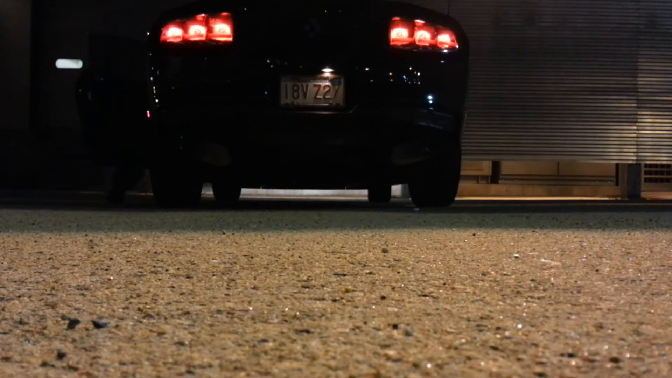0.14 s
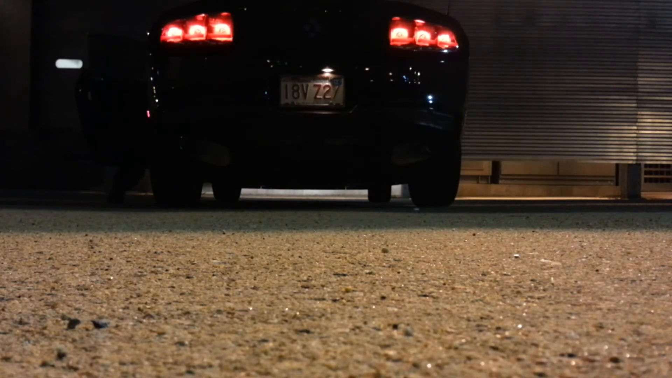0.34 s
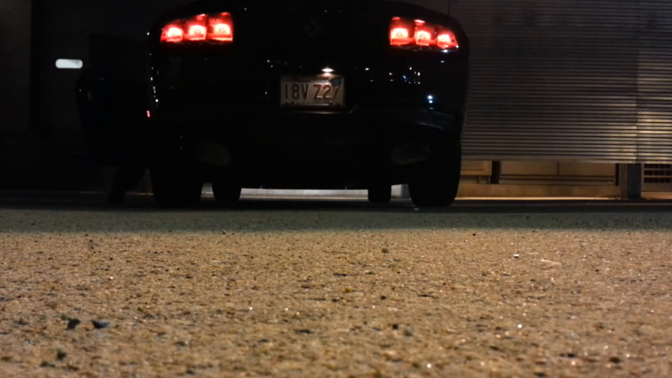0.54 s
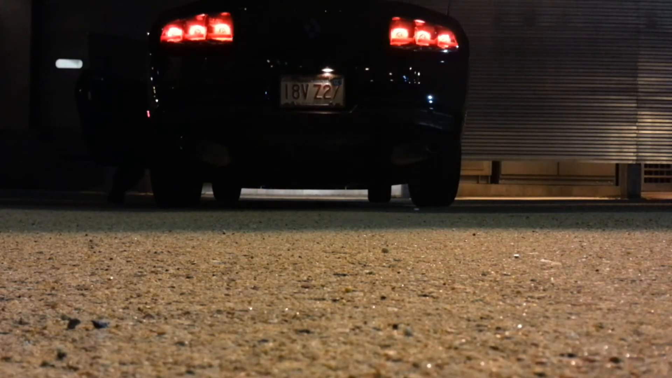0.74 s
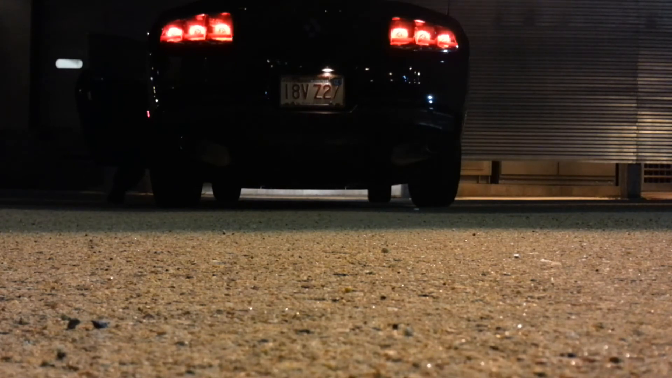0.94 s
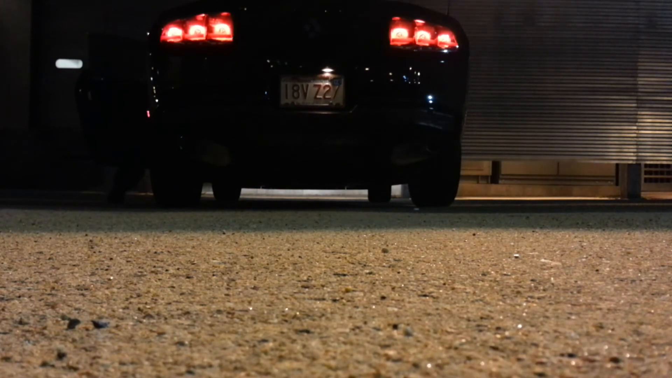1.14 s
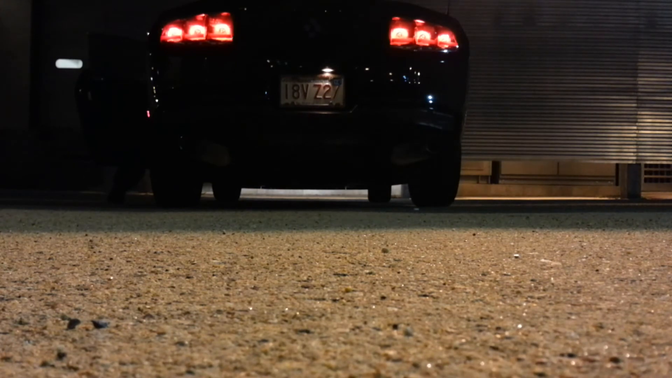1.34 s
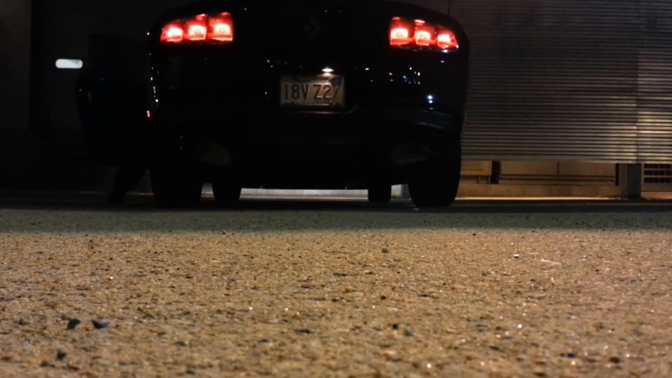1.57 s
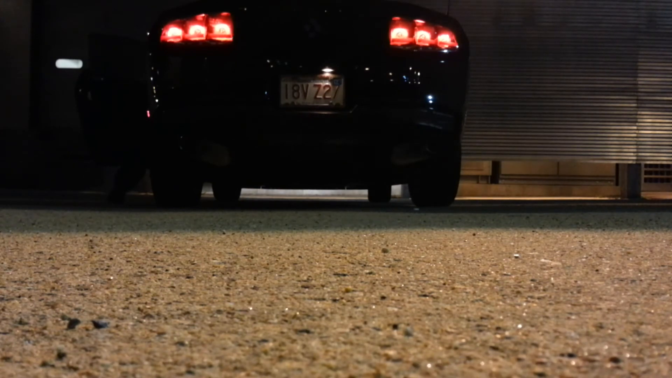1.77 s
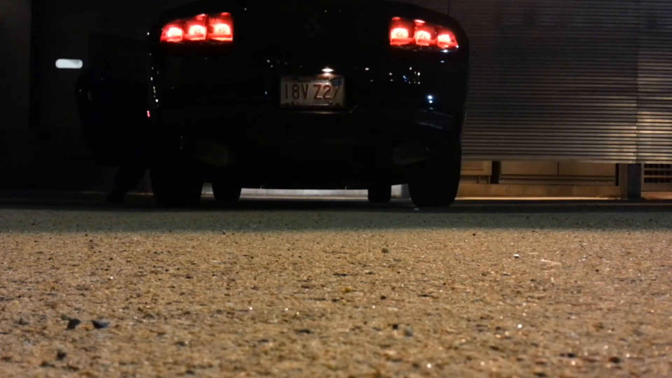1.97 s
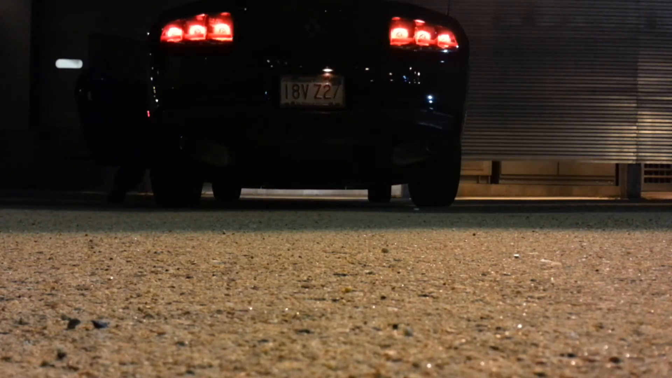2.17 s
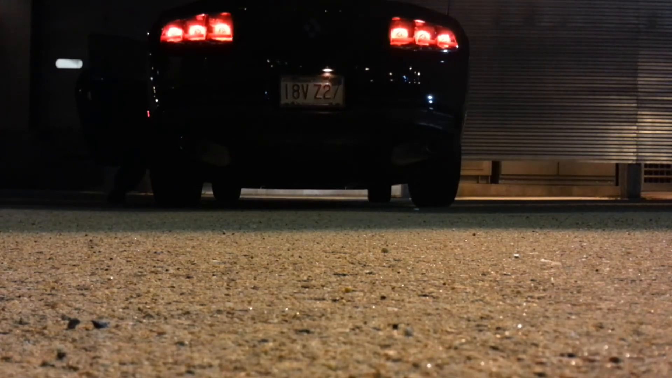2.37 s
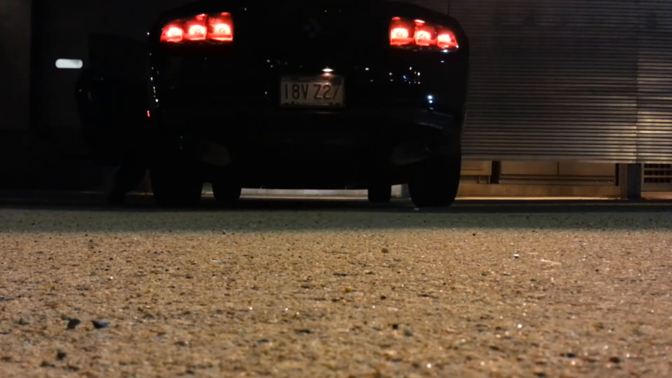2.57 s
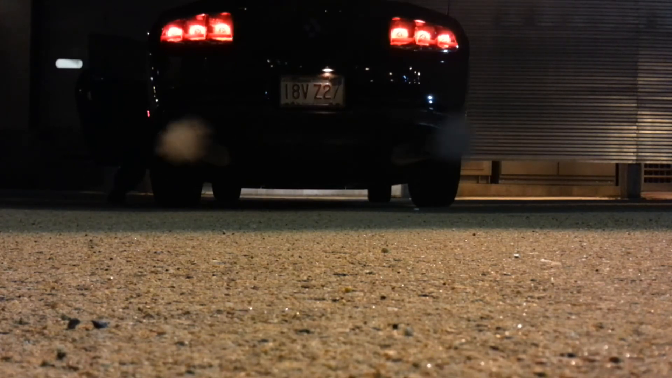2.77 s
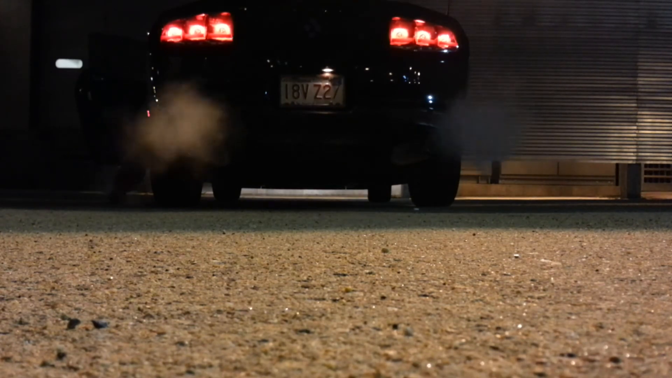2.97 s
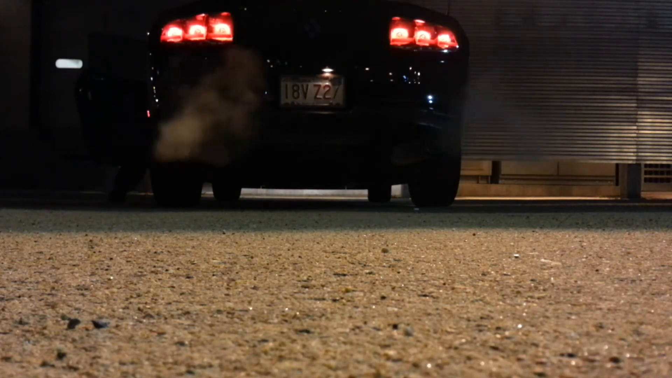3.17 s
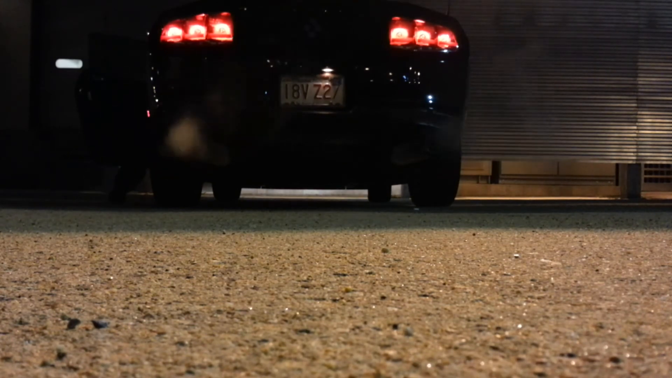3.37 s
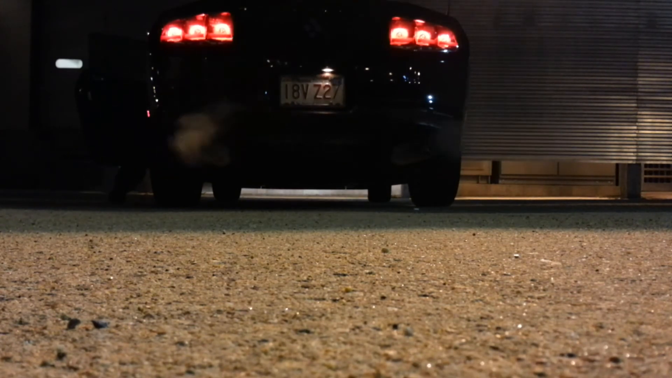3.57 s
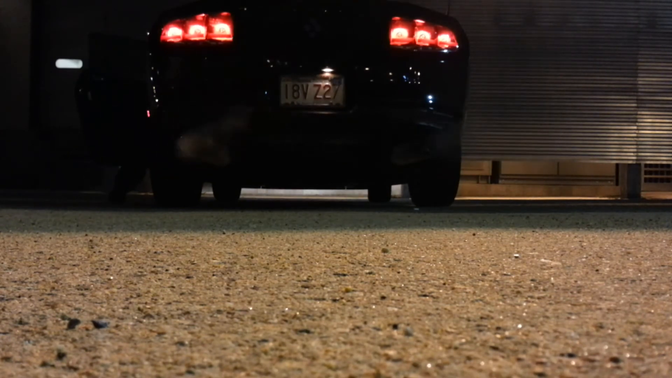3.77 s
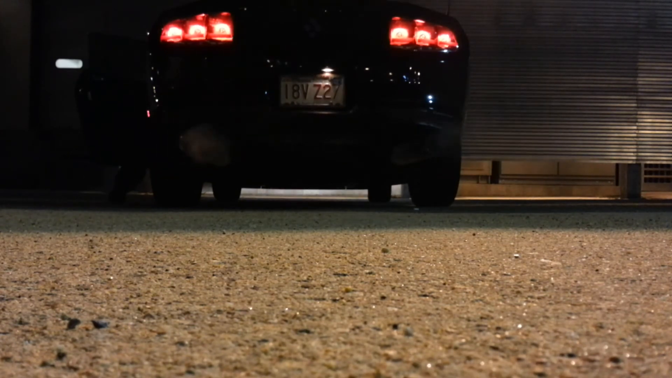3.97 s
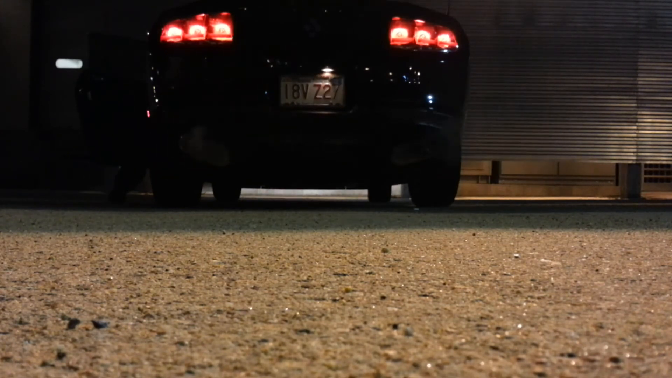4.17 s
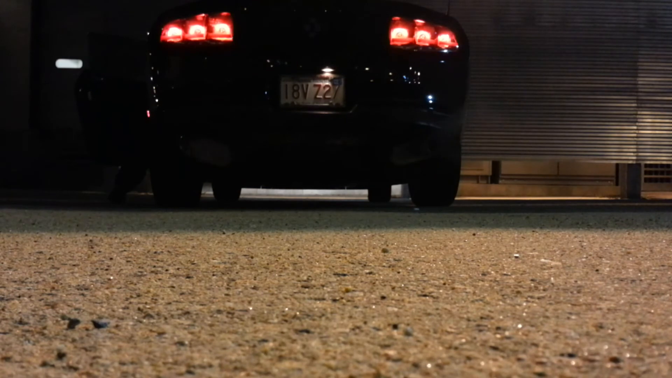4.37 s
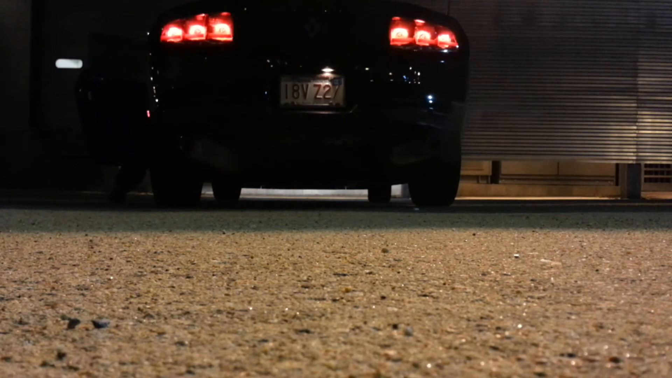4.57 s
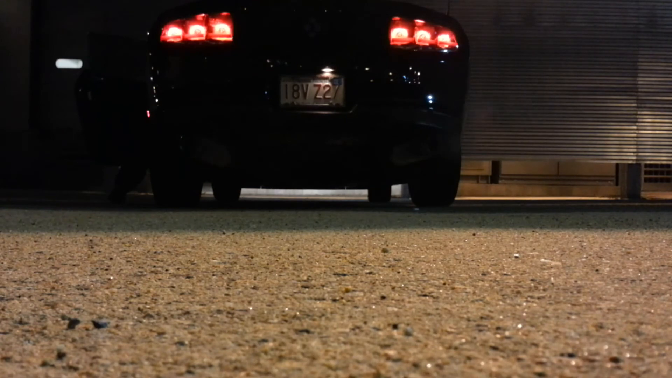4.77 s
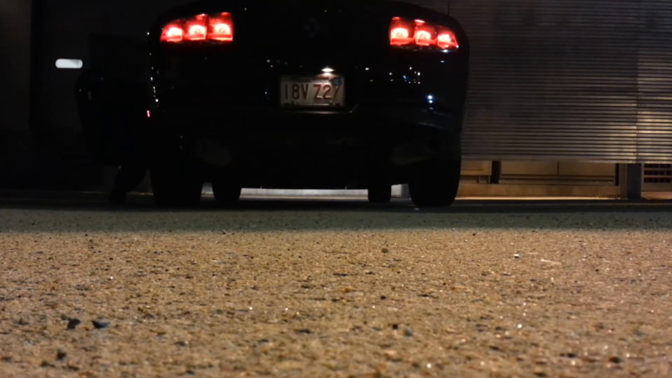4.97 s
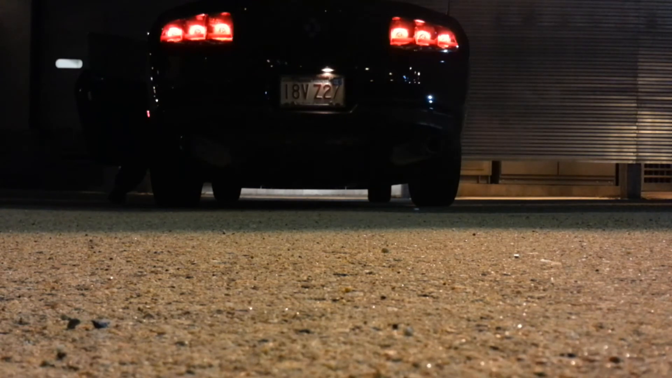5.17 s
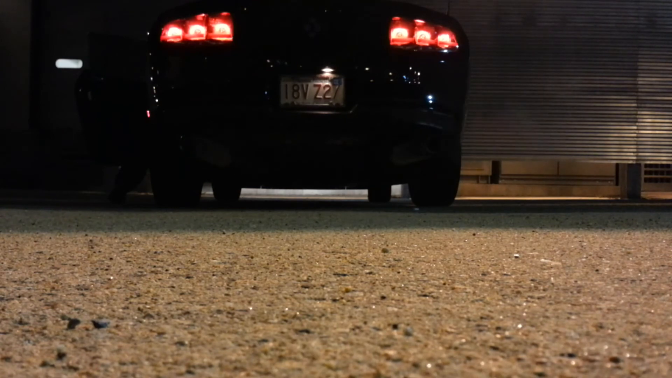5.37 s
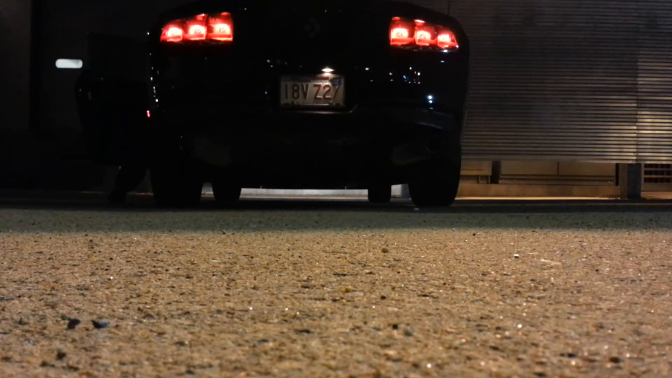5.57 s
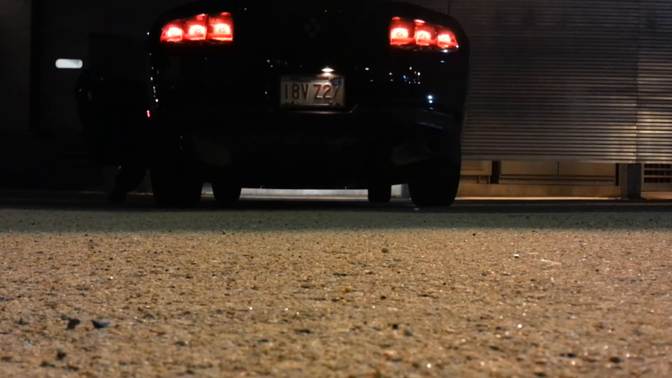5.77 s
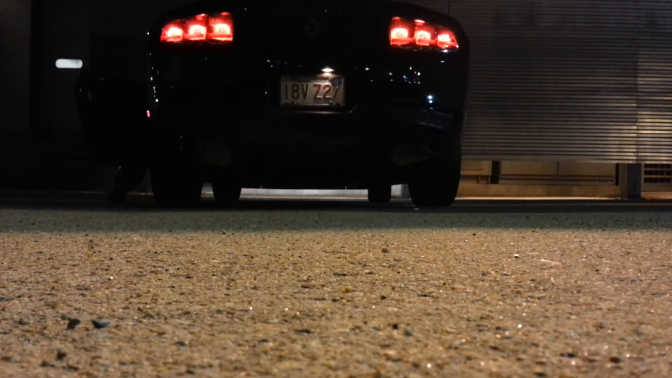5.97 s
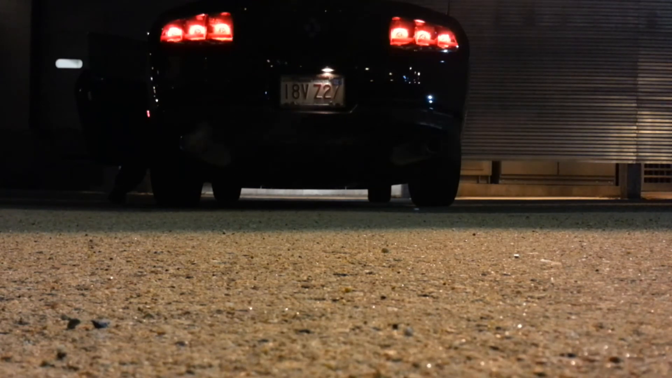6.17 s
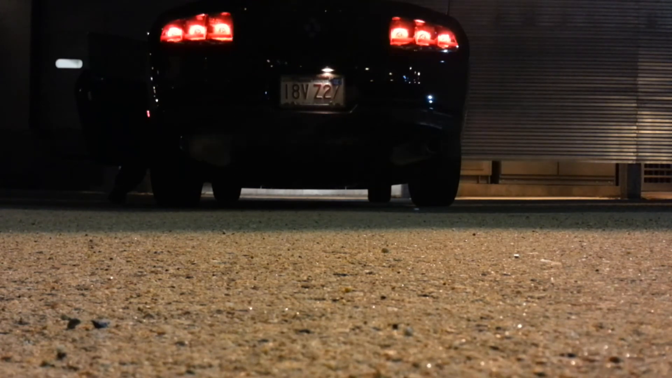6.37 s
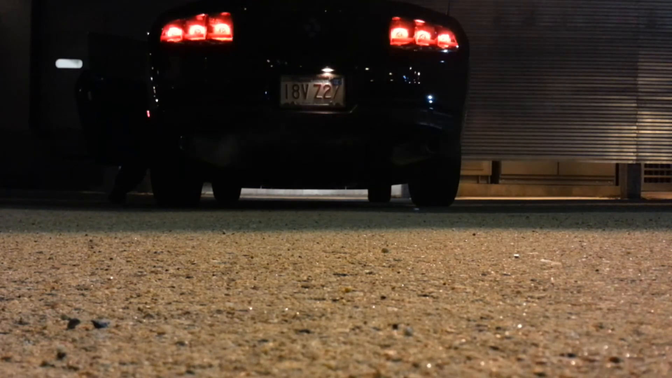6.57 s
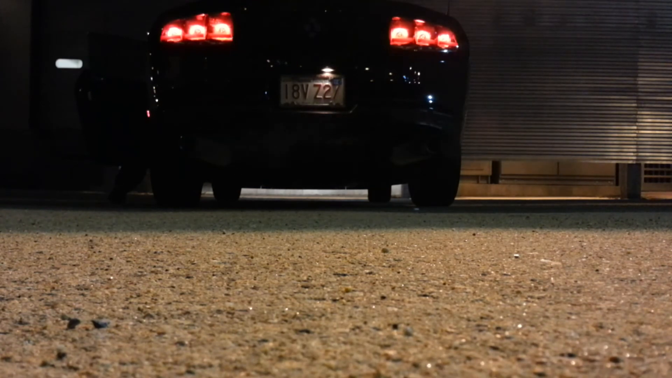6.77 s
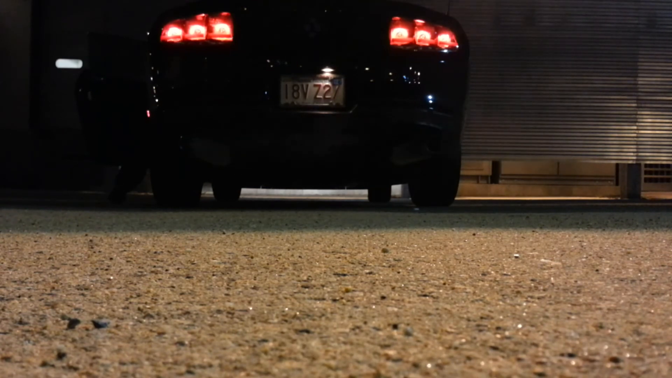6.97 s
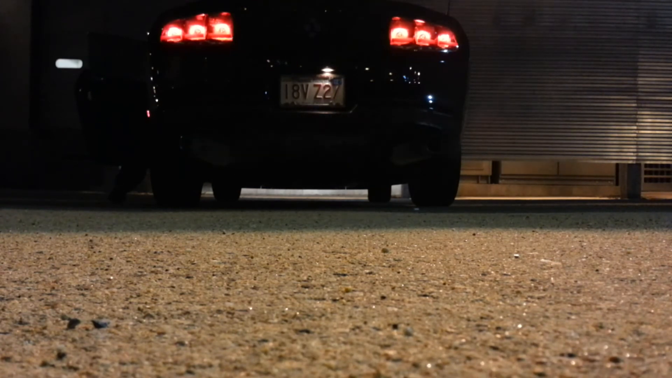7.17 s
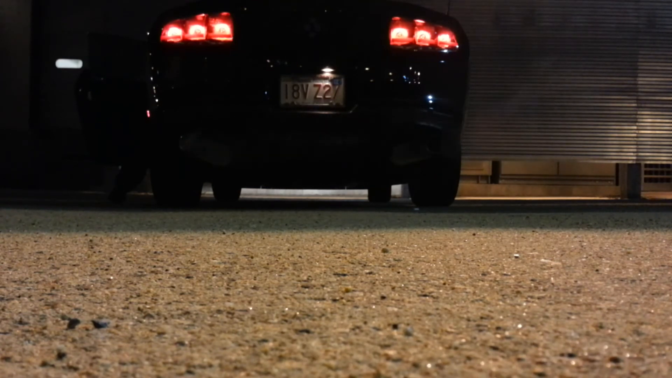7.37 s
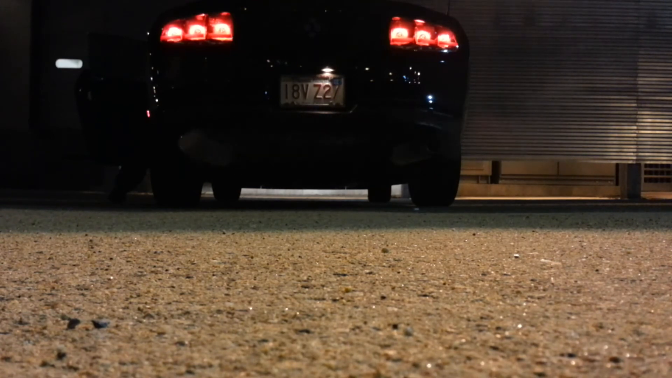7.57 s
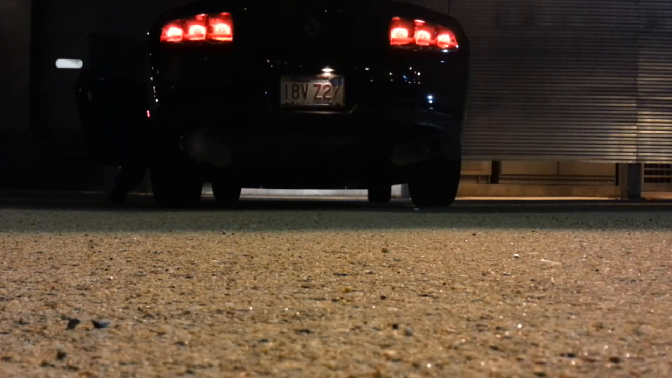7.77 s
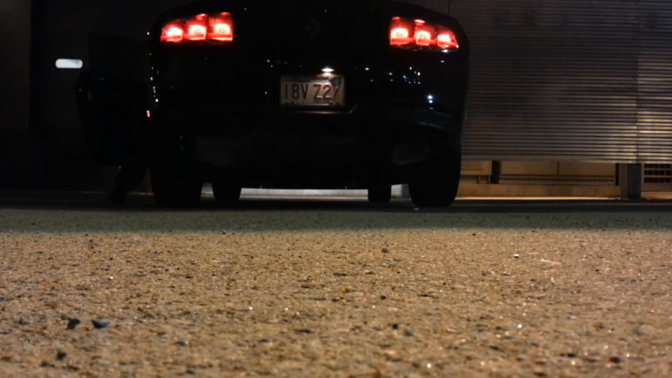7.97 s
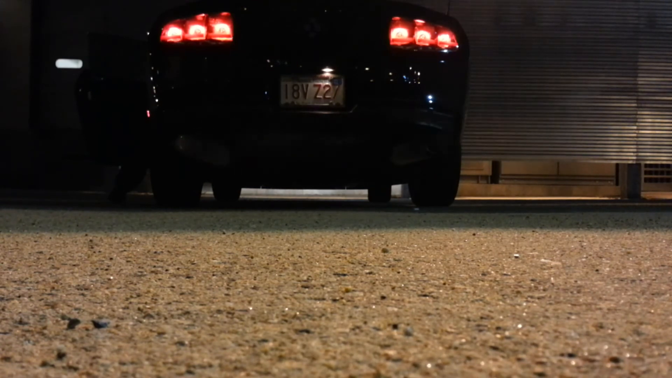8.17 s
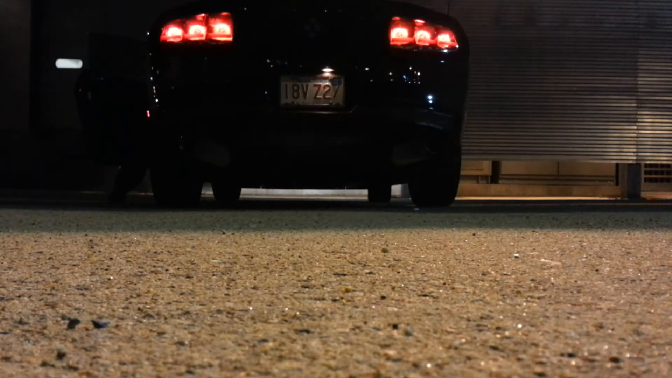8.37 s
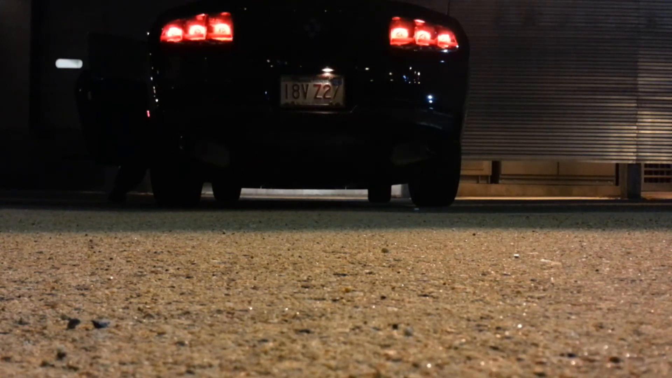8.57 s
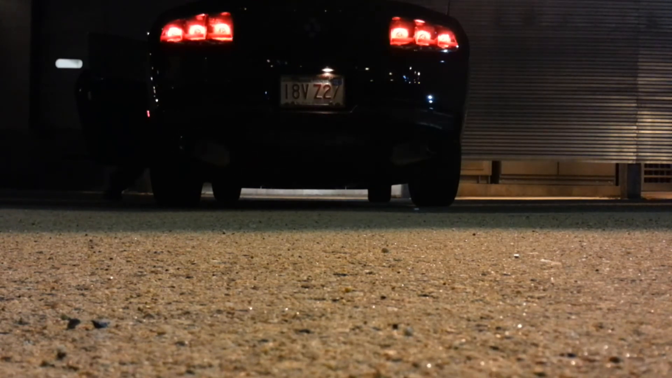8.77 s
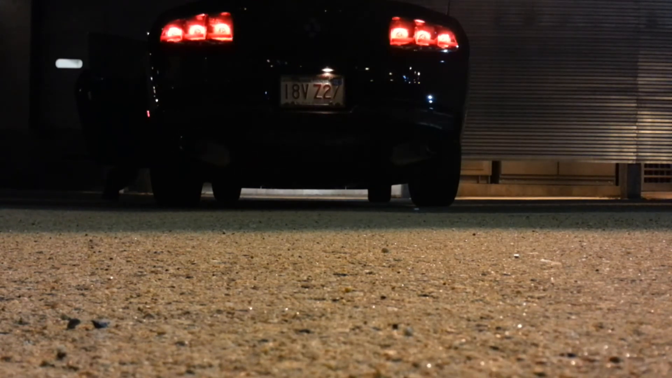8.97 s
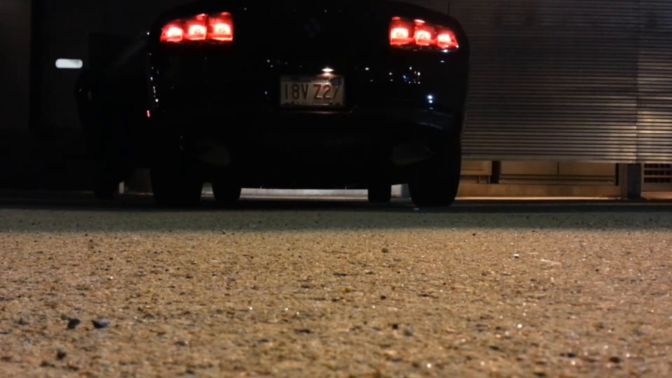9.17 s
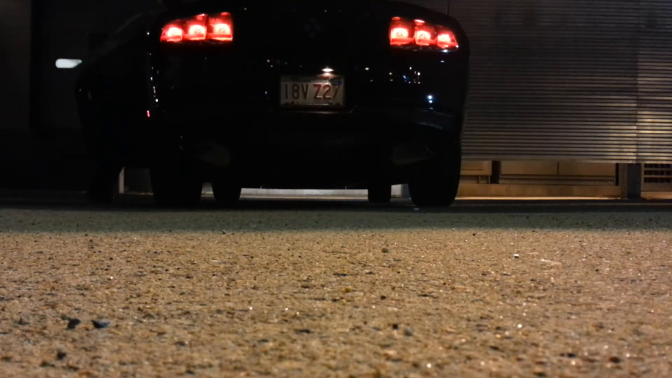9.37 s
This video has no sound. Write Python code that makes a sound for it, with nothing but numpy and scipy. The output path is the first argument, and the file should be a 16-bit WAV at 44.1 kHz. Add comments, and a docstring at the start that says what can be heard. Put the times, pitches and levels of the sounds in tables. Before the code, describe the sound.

A stereo microphone low on the ground faces the two tailpipes of a parked car. After near quiet and a thin pump hiss, a metallic clank and brief grinding crank start the six-cylinder engine. It barks up in speed, settles into a deep, uneven, raspy idle for several seconds, then slows quickly and stops. Distant traffic murmur and a few faint ticks remain.

```python
"""Thumping, raspy exhaust of a V6 car outdoors, heard in stereo near the ground, facing its twin tailpipes.
The fuel pump primes, the starter cranks, the engine catches, flares, settles to idle, then is switched off.
Every firing rings the silencer and pipes as a pulse and leaves the tailpipes as a puff of shaped noise.
Filtered noise makes the starter, pump and valve gear close by, and the town murmuring in the distance."""
import sys
import numpy as np
from scipy import signal
from scipy.fft import rfft, irfft
from scipy.io import wavfile
from scipy.ndimage import uniform_filter1d, minimum_filter1d

SR = 44100
rng = np.random.default_rng(int(sys.argv[2]) if len(sys.argv) > 2 else 0)


def bounce(signal):
    """Save signal as a 16-bit WAV file at the path given by the first command-line argument."""
    frames = np.transpose(np.atleast_2d(signal))
    limited = np.clip(frames, -1, 1)
    pcm = np.round(limited * 32767).astype(np.int16)
    wavfile.write(sys.argv[1], SR, pcm)


N = 416025
TIME, HZ = np.arange(N) / SR, np.fft.rfftfreq(2 ** 19, 1 / SR)  # seconds; Hz of the zero-padded spectrum

# Levels in the tables are relative: each voice is levelled, then given its gain.
# Engine speed: (time [s], exhaust pulse rate [1/s])
ENGINE_SPEED = [(2.69, 20.05), (2.75, 36.02), (2.81, 51.73), (2.92, 57.05), (3.05, 64.4), (3.25, 64.03),
                (3.45, 55.42), (3.62, 50.13), (3.9, 50.12), (4.4, 45.39), (4.58, 43.24), (4.8, 42.13),
                (5.2, 41.62), (7.83, 41.36), (7.92, 37.14), (8.05, 30.53), (8.2, 19.73), (8.39, 11.37)]
# Cylinders in firing order, banks in turn:
# (lateness [s], thump [dB], boom [dB], chuff [dB], whistle [dB])
CYLINDERS = [(.0001, 5.5, -2, -7, 3), (-.0002, 4.5, 2, 1, 2.2), (.0001, 3.5, 0, -7, 1.5),
             (-.0001, 5, -5, 1.5, 3.5), (0, 2.5, -2.5, -9, 4.5), (-.0001, 7, -9, 0, 0)]
# Load, positive as the engine pulls up to speed, negative as the revs sink: (time [s], level [dB])
LOAD = [(2.7, -1), (3.0, 5), (3.3, 3), (3.5, -1), (3.7, -11), (4.3, -5.5), (4.6, 1)]
# Throttle, open for a fast idle after the start, then closed: (time [s], opening [0-1])
THROTTLE = [(2.75, 0.14), (3.05, 0.83), (3.5, 0.99), (4.38, 1), (4.56, 0)]
# Exhaust voices, name: (at idle [dB], added at the catch [dB], added at fast idle [dB],
# lost per halving of speed below idle [dB])
EXHAUST_VOICES = {"silencer": (-25.5, 8, 1.5, 2.5), "pipe": (-20, -0.5, .5, 10.5),
                  "tailpipe": (-19, -8.5, 0, 13.5), "overtones": (-32, -3, 9, 12), "roar": (-32.5, 2, 7, 8),
                  "rasp": (-24, 7.5, -0.2, 11.5)}
# Brief exhaust swells from uneven running: (time [s], half length [s], silencer [dB], tailpipe [dB])
SURGES = [(2.867, .04, 3, 11.5), (3.357, 0.079, -4, 12), (3.518, 0.11, 10, 4.5), (5.3, .1, 3.5, -0.5),
          (5.947, 0.11, 5, -2), (6.444, 0.14, 6, -0.5), (7.45, 0.49, 6.5, -0.5), (8.082, 0.12, 8.5, -1)]
# Firings that spit sharply: (time [s], whistle level [dB])
SPITS = [(2.833, 6.5), (2.87, 13.5), (2.958, 7.5), (3.132, 3.5), (3.459, 12), (3.515, 10.5), (4.735, 10),
         (5.212, 9.5), (6.512, 8), (6.609, 7.5), (6.657, 8), (6.945, 9), (7.527, 9.5), (8.141, 6.5),
         (8.297, 9)]
# Firings the cold engine misses: (time [s])
MISFIRES = [2.888, 2.975, 3.039, 3.338, 3.441, 3.553]
# Brief dip of the rasp as the revs start to sink: (time [s], half length [s], level [dB])
RASP_DIP = (3.46, 0.12, -4.5)
# Speeds where a firing harmonic meets a pipe's note and it drones:
# (pulse rate [1/s], width [1/s], level [dB])
PIPE_DRONE = (45.6, 2.2, 7)
TAILPIPE_DRONE = (48.5, 3.07, 8.6)
# Resonances of the exhaust, the last being higher ones of the pipes:
# (frequency [Hz], width [Hz], level [dB])
SILENCER_MODES = [(51.3, 38, 1), (80.7, 5.1, 13)]
PIPE_MODES = [(140, 21, 1), (187.6, 48, -1)]
TAILPIPE_MODES = [(254.1, 11.4, 1)]
OVERTONE_MODES = [(286.6, 14, 4.5), (333.7, 25, 3.5), (398, 27, -8.5), (435, 33, -0.5), (503, 13, -14.5),
                  (639, 49, -7.5), (733, 16, -11)]
# Resonances of the starter's housing, the struck pinion and the whining pump:
# (frequency [Hz], width [Hz], level [dB])
HOUSING_MODES = [(994, 12, 11.5), (1174, 10, 2.5), (1524, 18, 5.5), (1750, 10, 2), (1918, 26, 9),
                 (2143, 17, 2), (2210, 9.5, -5), (2580, 65, 1), (3110, 19, -8), (3800, 11, 7),
                 (6400, 20, 9.5), (7100, 17, -21), (8000, 23, -13), (11030, 41, -1.5)]
CLANK_MODES = [(1940, 52, -14), (2190, 51, 13), (2300, 57, 13), (2680, 75, -12)]
PUMP_WHINE_MODES = [(5900, 61, 4), (6140, 150, -5)]
# Spectrum of the puffs: (frequency [Hz], left [dB], right [dB])
RASP_SPECTRUM = [(2080, -41, -34), (3040, -25.5, -20.5), (3490, -17, -13), (4150, -16.5, -10.5),
                 (4380, -8, -8), (4930, -4.5, -8), (5750, -7.5, 0), (5860, -36, -10.5), (6010, -8.5, 0),
                 (7190, -13.5, 1), (7000, -27, -3), (8350, -20, -12), (10030, -35, -21),
                 (14300, -87, -48.5)]
# Spectra of gas rush, valve gear, starter gears, pump and town: (frequency [Hz], density [dB per Hz])
ROAR_SPECTRUM = [(180, -6), (300, -1.5), (367, -10.5), (450, -4), (545, -11), (714, -6.5), (1700, -30.5),
                 (1930, -22), (2450, -47), (3000, -28), (3900, -59), (6600, -120)]
CLATTER_SPECTRUM = [(530, -46.5), (900, -2.5), (1220, -8), (1350, -4.5), (1690, -13.5), (1930, -8),
                    (2520, -13.5), (3500, -12), (4550, -23), (7700, -120)]
GEAR_SPECTRUM = [(290, -39), (500, -4), (892, -11.5), (971, -10.5), (1170, 1.5), (1320, -12), (1480, -12),
                 (1640, -6), (2140, -1.5), (2880, -5), (5000, -9.5), (6910, -3), (11200, -26), (12700, -47),
                 (14600, -64)]
PUMP_SPECTRUM = [(1760, -36), (3000, -6), (3790, -9), (4150, -3.5), (4930, -5.5), (6070, -1), (6660, -3),
                 (7620, -9), (10700, -23), (13000, -48)]
TOWN_SPECTRUM = [(15, -53), (25, -30), (59, -14), (131, -1), (205, -9.5), (290, -7), (379, -9),
                 (551, -11.5), (1020, -13.5), (1190, -16), (1780, -20), (3030, -37.5), (5600, -44),
                 (7710, -46.5), (14600, -58.5)]
# Starter strokes, a bite and then compressions: (start [s], rise [s], hold [s], level [dB])
STROKES = [(2.154, 0.013, 0.0091, -20), (2.19, .1, 0.056, -26), (2.427, 0.014, 0.027, -24.5),
           (2.527, 0.01, 0.028, -22.5), (2.623, 0.012, 0.032, -23)]
# Small ticks and puffs before the start and around the stop: (time [s], level [dB], rise [s], decay [s])
TICKS = [(.665, -50, .005, .05), (8.472, -39, .0004, .002), (8.508, -35, 0.0074, 0.012),
         (8.648, -51.5, 0.043, 0.024), (9.346, -39, 0.00063, 0.0018), (9.381, -46, .001, .004)]
# Likeness of the two microphones, used within 0 to 1: (frequency [Hz], likeness [1])
CAR_SAME = [(60, 0.77), (130, 1), (290, 1), (620, 0.94), (1360, 1), (2970, -0.17), (6490, 0.89),
            (14200, 0.45)]
STARTER_SAME = [(60, 0.9), (180, 0.79), (530, 0.58), (1590, 0.94), (4750, -1.1), (14200, -0.06)]
TOWN_SAME = [(60, 0.9), (130, 0.95), (290, 0.68), (620, 0.14), (1360, -0.71), (2970, -0.12), (6490, -0.054),
             (14200, 0.078)]
# Balance of the two microphones: (frequency [Hz], left minus right [dB])
CAR_SIDE = [(60, -1), (110, -5.5), (200, 1.5), (370, -0.5), (680, 0), (1250, -3.5), (2290, 1), (4200, -2.5),
            (7720, -11.5), (14200, -11)]
TOWN_SIDE = [(60, -5), (180, 1), (530, 0), (1590, 3), (4750, -2), (14200, -1.5)]

IDLE_RATE = 41  # pulses per s
# The first firings burn rich and hard; that dies away, and the pipes fall silent after the last stroke
CATCH_RISE_S, CATCH_DECAY_S, STOP_S = 0.025, 0.41, .12
MISFIRE_DB = -22
STROKE_RELEASE_S, WHIR_DB, LET_GO_S, SPIN_DOWN_DB_PER_S = 0.016, -32, 2.73, 51
PUMP_ON_S, PUMP_OFF_S, PUMP_RAMP_S, PUMP_DB = 0.738, 1.875, 0.023, -46.5
TOWN_DB = -30.5
EDGE_HZ, LIMIT = 14700, 1.0  # upper band limit; full scale


def firings(whistle_scatter_db=2.0, chuff_scatter_db=1.75, thump_scatter_db=1.5, boom_scatter_db=3.0):
    """Crank rotation gives the pulse times; cylinder and chance set thump, boom, chuff and whistle sizes."""
    s, rate = np.transpose(ENGINE_SPEED)
    turns = np.cumsum(np.interp(TIME, s, rate, 0, 0)) / SR + .5
    times = TIME[1:][np.diff(np.floor(turns)) > 0]
    cylinder = np.arange(len(times)) % len(CYLINDERS)
    late, thump_db, boom_db, chuff_db, whistle_db = np.array(CYLINDERS)[cylinder].T
    chance = rng.standard_normal((5, len(times)))
    chuff_db = chuff_db + chuff_scatter_db * chance[0]
    whistle_db = whistle_db + whistle_scatter_db * chance[4]
    for when, db in SPITS + [(when, MISFIRE_DB) for when in MISFIRES]:
        k = np.argmin(abs(times - when))
        whistle_db[k] = db
        chuff_db[k] += 0.59 * db
        thump_db[k] += 0.37 * min(db, 0)  # only a misfire weakens the thump
    lope = np.interp(np.interp(times, s, rate), [43, 49], [1, .3])  # the cylinders even out above idle
    times = times + lope * late + .00014 * chance[1]
    thump = amp(thump_db + thump_scatter_db * chance[2])
    boom = amp(lope * boom_db + boom_scatter_db * chance[3])
    return times, thump, boom, amp(chuff_db), amp(whistle_db)


def exhaust(times, thump, boom, lead_s=0.003264):
    """Each pulse, with the eddies behind it, rings the silencer, the pipe and the tailpipe."""
    eddies = evened(puffs(times, thump, 0.055, 1.0) * rng.standard_normal(N))
    times = times - lead_s  # the pressure wave runs ahead of the gas
    push = -evened(clicks(times, thump)) + .2 * eddies
    kick = -evened(clicks(times, boom)) + .25 * eddies
    silencer = filtered(push, ringing(SILENCER_MODES) * band(43.0, 121, order=4))
    pipe = filtered(push, ringing(PIPE_MODES) * band(113, 211.5))
    tailpipe = filtered(kick, ringing(TAILPIPE_MODES) * band(137, 225))
    overtones = filtered(-kick + 1.02 * eddies, ringing(OVERTONE_MODES) * band(224, 750))
    rate = curve(ENGINE_SPEED)
    throb_db = sum(bump(TIME, s, length, db) for s, length, db, _ in SURGES)
    boom_db = sum(bump(TIME, s, length, db) for s, length, _, db in SURGES)
    sound = levelled(silencer) * drive("silencer") * amp(throb_db)
    sound += levelled(pipe) * drive("pipe") * amp(bump(rate, *PIPE_DRONE))
    sound += levelled(tailpipe) * drive("tailpipe") * amp(boom_db + bump(rate, *TAILPIPE_DRONE))
    sound += levelled(overtones) * drive("overtones")
    return filtered(sound, balance(CAR_SIDE))


def rasp(times, chuff, whistle, split_hz=5900, lag_s=.00004, tear_db=2.5, crack_db=7):
    """Every puff tears out of the tailpipes as a broad chuff and a shorter, shriller whistle."""
    right_lag = np.exp(-2j * np.pi * HZ * lag_s * np.array([[0], [1]]))
    colour = amp([read(RASP_SPECTRUM, 1), read(RASP_SPECTRUM, 2)]) * right_lag
    colour = colour / np.sqrt(np.mean(abs(colour) ** 2) / 2)
    upper = 1 / (1 + (HZ / split_hz + 1e-3) ** -24)  # power share above the split
    tearing = amp(tear_db * flutter())
    low = puffs(times, chuff, 0.25, 0.14) * tearing
    spit = np.maximum(whistle - 1.3, 0) * amp(crack_db)  # only the strongest puffs spit
    crack = puffs(times, spit, 0.012, 0.025)
    high = np.hypot(puffs(times, whistle, 0.11, 0.18), crack) * tearing
    total = np.hypot(low, high) + 1e-9
    gain = levelled(total) / total * drive("rasp") * amp(bump(TIME, *RASP_DIP))
    flow = gain * rng.standard_normal((2, N))
    chuffs = filtered(low * flow[0], colour * np.sqrt(1 - upper))
    whistles = filtered(high * flow[1], colour * np.sqrt(upper))
    return walls(chuffs + whistles, wet=0.34, decay_s=0.059)


def roar(times, thump):
    """The dull rush of gas leaving the pipes is noise that follows the flow of the puffs."""
    bark = ramp(curve(LOAD) / 2)  # under load the rush breaks into separate bursts
    steady = (1 - bark) * puffs(times, thump, 0.082, 1.0)
    bursts = 0.79 * bark * puffs(times, thump, 0.1, 0.24)
    gain = levelled(steady + bursts) * drive("roar") * amp(curve(LOAD))
    return gain * noise(amp(read(ROAR_SPECTRUM)), CAR_SAME, CAR_SIDE)


def drive(voice):
    """Gain of one exhaust voice follows the catch, the throttle and the loss below idle speed."""
    idle_db, catch_db, throttle_db, slow_db = EXHAUST_VOICES[voice]
    since = TIME - ENGINE_SPEED[0][0]
    until = ENGINE_SPEED[-1][0] + STOP_S - TIME
    running = ramp(since / CATCH_RISE_S) * ramp(until / STOP_S) ** 2
    catch = np.exp(-np.maximum(since, 0) / CATCH_DECAY_S)
    halvings = np.maximum(np.log2(IDLE_RATE / curve(ENGINE_SPEED)), 0)
    level_db = idle_db + catch_db * catch + throttle_db * curve(THROTTLE) - slow_db * halvings
    return running * amp(level_db)


def starter(grind_db=2.5, ring_db=-2.0, grain_db=-0.5, shake_db=-17):
    """Pinion teeth grind on the flywheel and ring the housing, loudest on each compression."""
    teeth = evened(amp(grain_db * flutter()))
    grind = teeth * noise(amp(read(GEAR_SPECTRUM)), STARTER_SAME, CAR_SIDE)
    shake = noise(band(47, 140), CAR_SAME, CAR_SIDE)  # the block rocks on its mounts
    ring = noise(ringing(HOUSING_MODES) * band(870, 6600), STARTER_SAME, CAR_SIDE)
    return cranking() * (amp(grind_db) * grind + amp(ring_db) * ring + amp(shake_db) * shake)


def cranking():
    """The starter's effort: a whir that spins down once let go, and a rise, hold and release per stroke."""
    spin_down_db = SPIN_DOWN_DB_PER_S * np.maximum(TIME - LET_GO_S, 0)
    whir = (TIME > STROKES[0][0]) * amp(WHIR_DB - spin_down_db)
    strokes = np.zeros(N)
    for s, rise, hold, db in STROKES:
        release = np.exp(-np.maximum(TIME - s - rise - hold, 0) / STROKE_RELEASE_S)
        strokes += amp(db) * ramp((TIME - s) / rise) * release
    return np.hypot(whir, strokes)


def solenoid(strike_s=2.158, clank_db=-10):
    """The solenoid slams the pinion home, and the blow rings a few damped resonances."""
    blow = clicks(np.array([strike_s]), [1.])
    ring = filtered(blow, ringing(CLANK_MODES) * band(1300, 4800))
    pair = ring / abs(ring).max() * np.array([[1.2], [.8]])  # nearer the left microphone
    return walls(amp(clank_db) * pair, wet=1.0, decay_s=0.018)


def engine_bay(clatter_db=-40, ring_db=-48, hush=1.16, strain=0.45):
    """Valve gear and belts rustle while the shaft turns, louder under load, hushed as the revs sink."""
    s, rate = np.transpose(ENGINE_SPEED)
    pace = np.minimum(np.interp(TIME, s, rate, 0, 0) / IDLE_RATE, 1) ** 1.4
    load = curve(LOAD)
    load_gain = amp(hush * np.minimum(load, 0) + strain * np.maximum(load, 0))
    rustle = amp(clatter_db) * noise(amp(read(CLATTER_SPECTRUM)), CAR_SAME, CAR_SIDE)
    ring = amp(ring_db) * noise(ringing(HOUSING_MODES), CAR_SAME, CAR_SIDE)
    return pace * load_gain * (rustle + ring)


def pump_hiss():
    """Broad hiss in the pump's colour."""
    return noise(amp(read(PUMP_SPECTRUM)), STARTER_SAME, CAR_SIDE)


def fuel_pump(whine_db=-7):
    """The pump runs once to prime the line, hissing and whining through two resonances."""
    whine = amp(whine_db) * noise(ringing(PUMP_WHINE_MODES) * band(5400, 7200), STARTER_SAME, CAR_SIDE)
    priming = ramp(np.minimum(TIME - PUMP_ON_S, PUMP_OFF_S - TIME) / PUMP_RAMP_S)
    return amp(PUMP_DB) * priming * (0.91 * pump_hiss() + whine)


def small_ticks():
    """Ticks and small puffs are short bursts of hiss."""
    return pump_hiss() * sum(amp(db) * swell(TIME - s, rise, decay) for s, db, rise, decay in TICKS)


def town(hum_db=-38):
    """Far traffic is a broad murmur, with the low resonant drone of ventilation."""
    vents = ringing([(135, 12.4, -1.1), (229.4, 22, -0.9)])  # (frequency [Hz], width [Hz], level [dB])
    drone = noise(vents * band(106, 340), TOWN_SAME, TOWN_SIDE)
    murmur = noise(amp(read(TOWN_SPECTRUM)), TOWN_SAME, TOWN_SIDE)
    return amp(TOWN_DB) * murmur + amp(hum_db) * drone


def walls(pair, wet, decay_s):
    """Ground, underbody and nearby walls scatter a sound into a short tail of decaying noise."""
    t = np.arange(SR // 3) / SR
    tail = rng.standard_normal((2, len(t))) * np.exp(-t / decay_s)
    return pair + wet * signal.fftconvolve(pair, tail / np.linalg.norm(tail[0]), axes=1)[:, :N]


def noise(response, same, side):
    """Coloured noise at two partly alike microphones, their mean at unit power."""
    a, b = rfft(rng.standard_normal((2, 2 * len(HZ) - 2)))
    c = np.clip(read(same), 0, 1)
    right = c * a + np.sqrt(1 - c ** 2) * b
    pair = irfft(np.array([a, right]) * response * balance(side))[:, :N]
    return pair / np.sqrt(np.mean(pair.mean(0) ** 2))


def puffs(times, sizes, rise, decay):
    """Gas puff envelope; rise and decay are shares of the firing gap, so slow puffs last longer."""
    edges = np.r_[2 * times[0] - times[1], times, 2 * times[-1] - times[-2]]
    turns = np.interp(TIME, edges, np.arange(len(edges)))
    sizes = np.r_[0, sizes, 0, 0]
    k = turns.astype(int)
    last = sizes[k] * swell(turns - k, rise, decay)
    coming = sizes[k + 1] * swell(turns - k - 1, rise, decay)
    return np.hypot(last, coming)


def swell(t, rise, decay):
    """A burst that peaks at t = 0, exponential on both sides."""
    return np.exp(-np.maximum(-t / rise, t / decay))


def clicks(times, sizes):
    """Single-sample pulses."""
    return np.bincount(np.clip(np.round(times * SR).astype(int), 0, N - 1), sizes, N)


def flutter():
    """Random unit-power wobble, smoothed over about a millisecond."""
    return evened(uniform_filter1d(rng.standard_normal(N), size=50))


def ringing(modes):
    """Frequency response of a set of damped resonances."""
    return sum(amp(db) * 1j * HZ * width / (hz ** 2 - HZ ** 2 + 1j * HZ * width) for hz, width, db in modes)


def band(low_hz, high_hz, order=2):
    """Causal band-pass response."""
    return signal.freqs(*signal.butter(order, [low_hz, high_hz], "band", analog=True), HZ)[1]


def filtered(x, response):
    """Applies a frequency response."""
    return irfft(rfft(x, 2 * len(HZ) - 2) * response)[..., :N]


def balance(side):
    """Left and right gains over frequency."""
    return amp(read(side) * [[.5], [-.5]])


def levelled(x):
    """Near unit power over roughly an idling engine cycle or more; the throb within a cycle stays."""
    power = uniform_filter1d(uniform_filter1d(x ** 2, size=6400), size=3200)
    return x / np.sqrt(abs(power) + 0.0017 * np.mean(x ** 2))


def evened(x):
    """Unit power overall."""
    return x / np.sqrt(np.mean(x ** 2) + 1e-20)


def amp(db):
    """Decibels to amplitude."""
    return 10 ** (np.asarray(db) / 20)


def curve(rows, column=1):
    """A table column drawn out over time."""
    rows = np.array(rows)
    return np.interp(TIME, rows[:, 0], rows[:, column])


def read(points, column=1):
    """A table column drawn out over log frequency."""
    points = np.array(points)
    return np.interp(np.log(HZ + 1), np.log(points[:, 0] + 1), points[:, column])


def ramp(x):
    """Holds x between 0 and 1."""
    return np.clip(x, 0, 1)


def bump(x, centre, width, db):
    """A bell-shaped change in level around one time or speed."""
    return db * np.exp(-((x - centre) / width) ** 2)


def scene():
    """The car's sounds from the tailpipes to its small ticks, with the town behind."""
    times, thump, boom, chuff, whistle = firings()
    pipes = exhaust(times, thump, boom) + rasp(times, chuff, whistle) + roar(times, thump)
    starting = starter() + solenoid() + fuel_pump()
    return pipes + starting + engine_bay() + small_ticks() + town()


def record(dry):
    """A fast limiter holds the tallest peaks near full scale; then the band limit."""
    gain = LIMIT / np.maximum(abs(dry).max(0), LIMIT)
    held = dry * uniform_filter1d(minimum_filter1d(gain, size=101), size=101)
    lowpass = signal.firwin(511, EDGE_HZ, window=("kaiser", 9), fs=SR)
    return signal.oaconvolve(held, lowpass[None], "same")


dry = scene()
out = record(dry)
bounce(out)
```